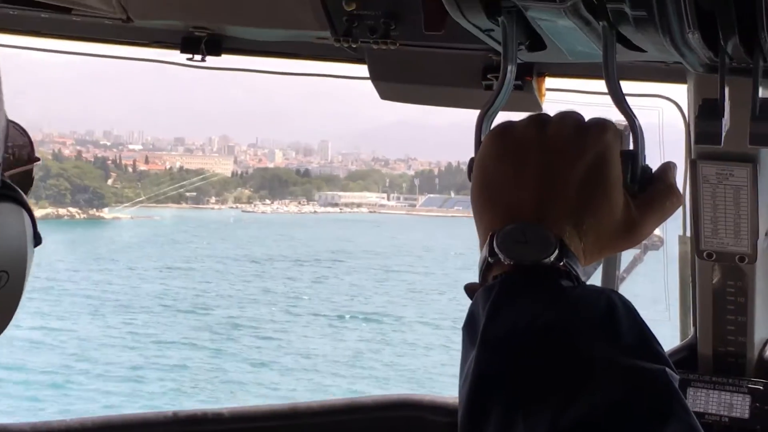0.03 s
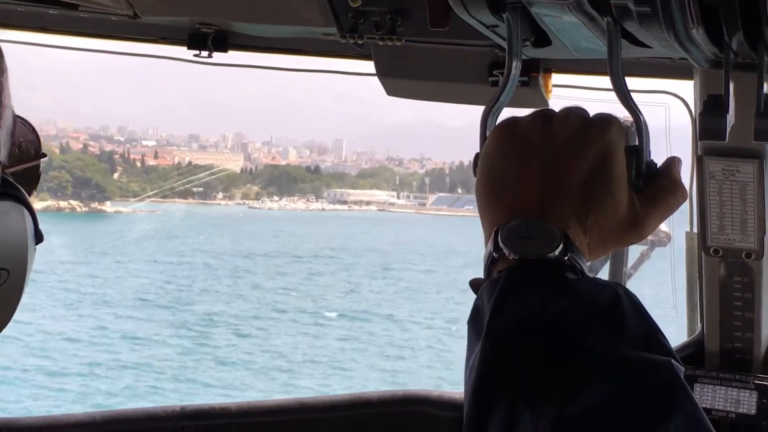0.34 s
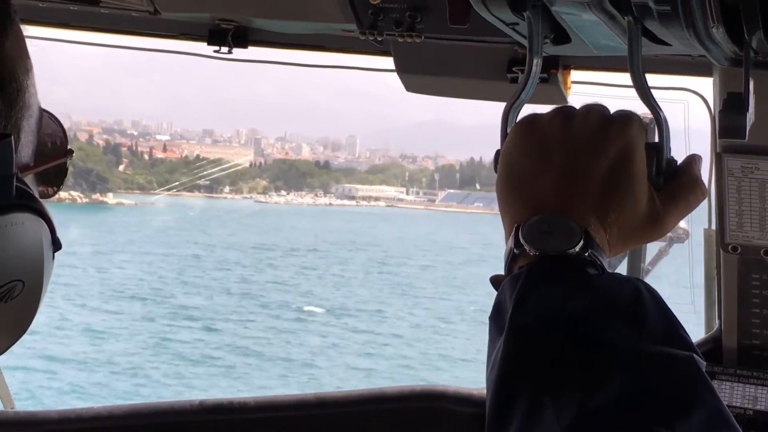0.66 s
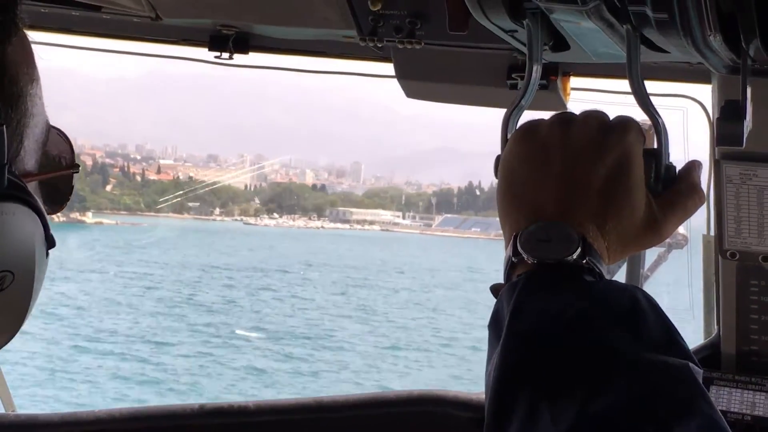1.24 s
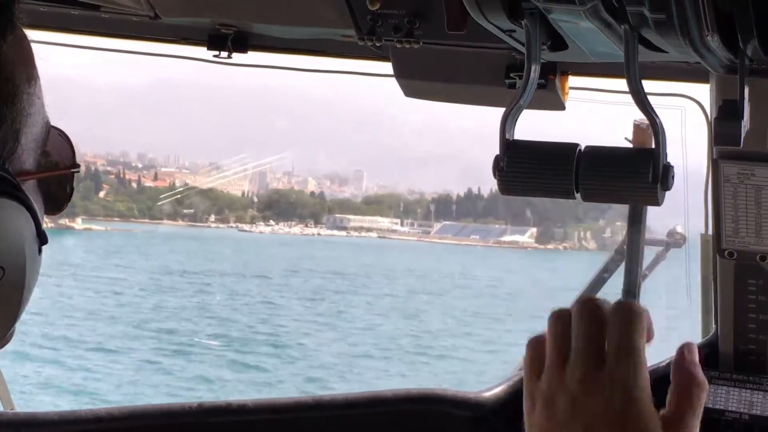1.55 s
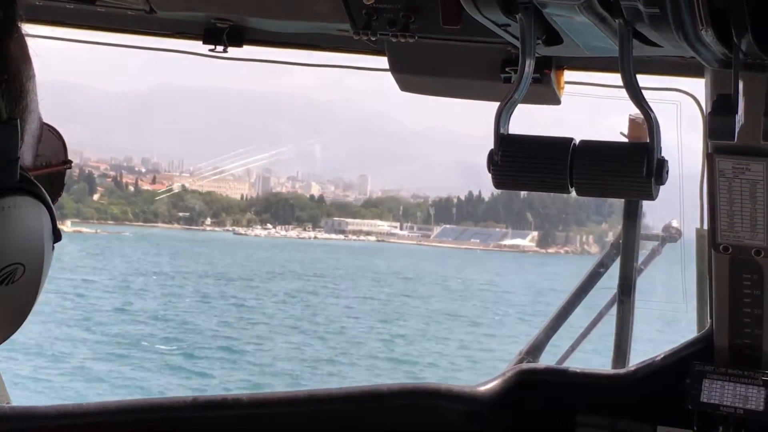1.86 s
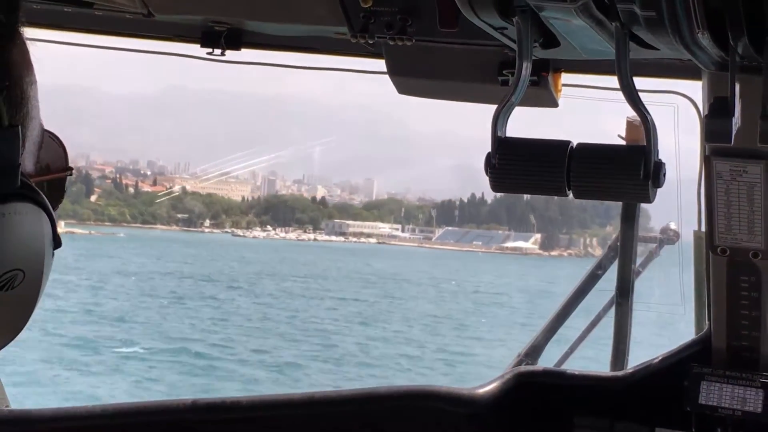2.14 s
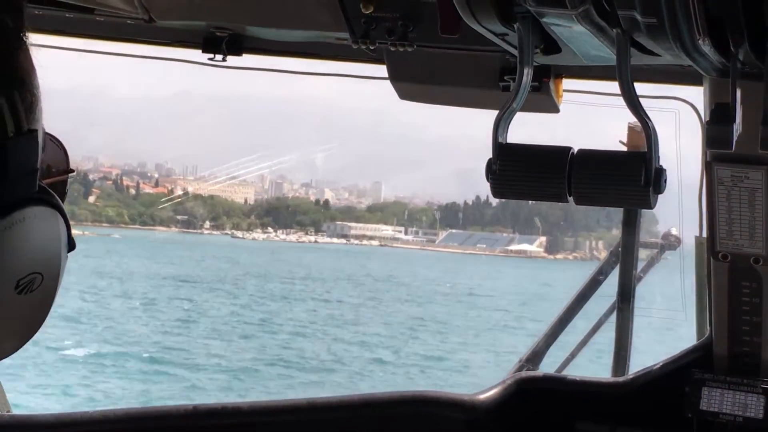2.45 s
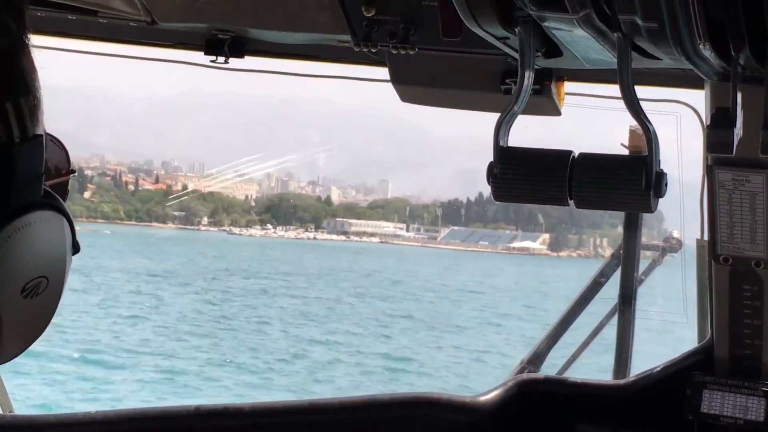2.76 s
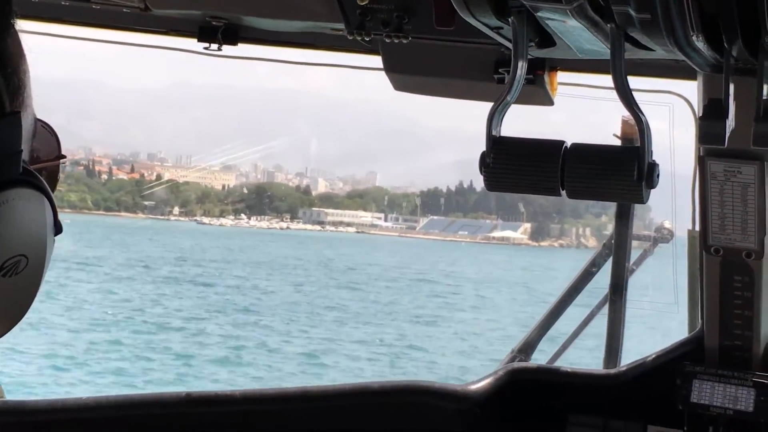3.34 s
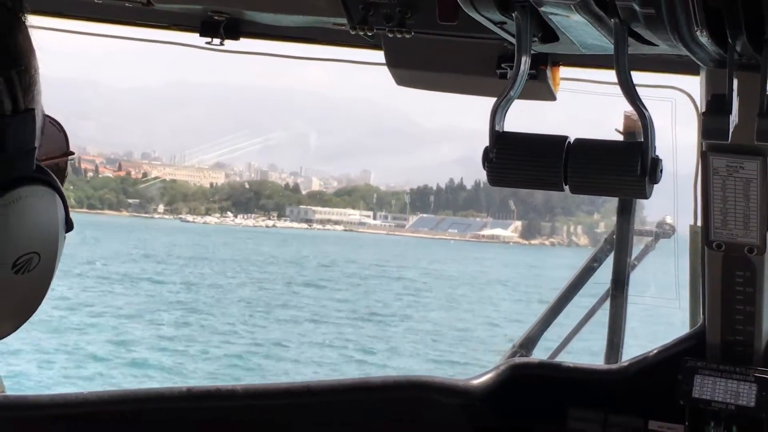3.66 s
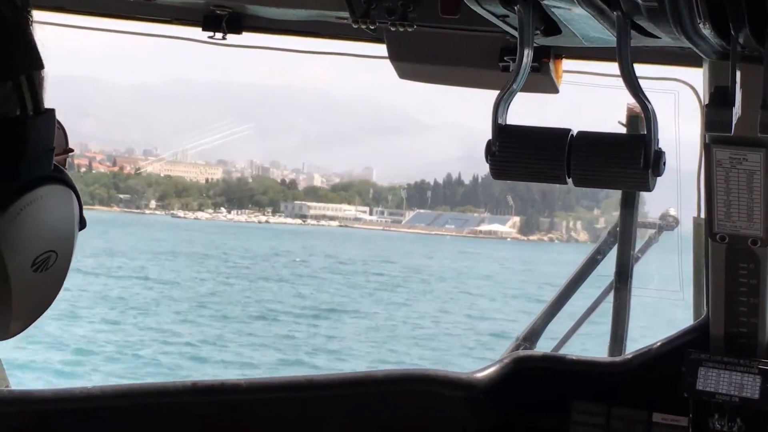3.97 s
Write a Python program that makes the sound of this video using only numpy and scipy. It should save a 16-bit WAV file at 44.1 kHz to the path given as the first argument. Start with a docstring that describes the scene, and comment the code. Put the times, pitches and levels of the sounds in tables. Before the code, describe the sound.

A deep, pulsing propeller drone fills the cabin of a small plane in flight, with the microphone in the cockpit. The propellers speed up a little while the low rumble and air rush ease slightly. A thin turbine whine wavers above.

```python
"""Two propellers drone, heard in the cockpit of a turboprop seaplane flying low over water.
Each blade sends a suction pulse through the hull. The propellers speed up a little and settle,
slightly out of step, so the drone throbs four to five times a second.
Under them buffeting makes the hull rumble; above them air rushes past, easing off, and the
turbines whine."""
import sys
import numpy as np
from scipy import signal
from scipy.fft import rfft, irfft
from scipy.io import wavfile

SR = 44100
rng = np.random.default_rng(int(sys.argv[2]) if len(sys.argv) > 2 else 0)


def transcribe(u):
    """Save the signal u as a 16-bit wav file named by the first command-line argument.

    u: samples, shape (n,) or (channels, n), limited to [-1, 1]; the rate is SR.
    q: integer samples, one column per channel.
    """
    v = np.clip(np.atleast_2d(u).T, -1, 1)
    q = np.round(v * 32767).astype(np.int16)
    wavfile.write(sys.argv[1], SR, q)


N = 176400


def undb(db):
    """Decibels to gain."""
    return 10 ** (np.asarray(db) / 20)


def unit_rms(x):
    """Scale to rms 1."""
    return x / np.sqrt(np.mean(x ** 2))


def curve(table, column=1):
    """One table column, interpolated linearly in time."""
    rows = np.array(table, float)
    return np.interp(np.arange(N) / SR, rows[:, 0], rows[:, column])


def wander(per_s):
    """Smooth random signal, rms 1, changing about per_s times a second."""
    hz = np.arange(N // 2 + 1) * SR / N
    lowpass = np.exp(-(2 * hz / per_s) ** 2) * (hz > 0)
    return unit_rms(irfft(rfft(rng.standard_normal(N)) * lowpass, N))


def coloured_noise(spectrum):
    """Noise, rms 1, shaped by (Hz, dB) points."""
    points_hz, points_db = np.array(spectrum, float).T
    hz = np.maximum(np.arange(N // 2 + 1) * SR / N, 1)
    gain = undb(np.interp(np.log(hz), np.log(points_hz), points_db))
    return unit_rms(irfft(rfft(rng.standard_normal(N)) * gain, N))


def noise_band(centre_hz, width_hz):
    """Narrow noise band, rms 1; the centre may move."""
    phase = 2 * np.pi * np.cumsum(centre_hz * np.ones(N)) / SR
    return wander(2 * width_hz) * np.cos(phase) + wander(2 * width_hz) * np.sin(phase)


def blade_passes(rate_hz, in_step_s=0.109):
    """Running count of blade passes, zero at in_step_s for both propellers."""
    passes = np.cumsum(rate_hz) / SR
    return passes - np.interp(in_step_s * SR, np.arange(N), passes)


# Blade-pass rates. Each row: time in seconds, near propeller in Hz, far propeller in Hz.
BLADE_RATES = [(0.0, 95.44, 91.08), (0.6, 96.23, 91.83), (1.0, 97.19, 92.41), (1.35, 98.47, 93.32),
               (1.7, 98.99, 94.08), (2.3, 98.66, 94.37), (3.2, 98.58, 94.01), (4.0, 98.18, 93.44)]
# Blade harmonics in the cabin. Each row: multiple, near level in dB, far level in dB,
# gain in dB per Hz of near blade rate above cruise.
BLADE_HARMONICS = [(1, -17, -22, 0.3), (2, -19.6, -24.5, -0.1), (3, -22.5, -38.5, -0.23),
                   (4, -37.5, -40, 1.2), (5, -46, -52.5, .5), (6, -42, -53.5, 0.9), (7, -43, -60, 2.1),
                   (8, -65, -65, 1.5), (9, -56.5, -73, 1), (10, -58.5, -57, 2.5)]
NEAR, FAR = 1, 2  # columns of both tables
CRUISE_HZ, FLUTTER_PER_S, JITTER_PASSES = 98.5, 27, 0.0022


def propeller(side, fundamental_lag_s):
    """Blade suction pulses cross the hull; cabin gain shifts with speed, and turbulence shakes it."""
    rate_hz = curve(BLADE_RATES, side)
    passes = blade_passes(rate_hz) + JITTER_PASSES * wander(FLUTTER_PER_S)
    overspeed_hz = curve(BLADE_RATES, NEAR) - CRUISE_HZ
    drone = 0
    for row in BLADE_HARMONICS:
        multiple, cruise_db, db_per_hz = round(row[0]), row[side], row[-1]
        flutter_db = 0.95 if multiple * CRUISE_HZ > 350 else 0.47
        level_db = cruise_db + db_per_hz * overspeed_hz + flutter_db * wander(FLUTTER_PER_S)
        cycles = multiple * passes
        if multiple == 1:
            cycles -= fundamental_lag_s * rate_hz
        drone -= np.sqrt(2) * undb(level_db) * np.cos(2 * np.pi * cycles)
    return drone


# Rumble spectrum. Each row: frequency in Hz, relative density in dB.
RUMBLE_SPECTRUM = [(15, -42), (23, -23), (31, -15), (42, -3), (63, 0), (85, -5.5), (125, -10.5),
                   (165, -15.5), (225, -21.5), (280, -15.5), (340, -25.5), (440, -34), (800, -55.5)]
# Rumble envelope. Each row: time in seconds, level in dB.
RUMBLE_ENVELOPE = [(0, -23), (.7, -22), (1.3, -25), (2.2, -26), (4, -25)]


def hull_rumble(swell_db=1.1):
    """Buffeting shakes the hull into a low, uneven rumble."""
    return coloured_noise(RUMBLE_SPECTRUM) * undb(curve(RUMBLE_ENVELOPE) + swell_db * wander(3.4))


# Air rush spectrum. Each row: frequency in Hz, relative density in dB.
AIR_SPECTRUM = [(200, -1.5), (450, 1), (680, 4), (800, -1), (1000, -1), (1100, -1), (1300, 0.5), (1600, -3),
                (1850, -2.5), (2400, -4.5), (2850, -8.5), (3600, -7), (4350, -11.5), (4900, -14.5),
                (5600, -12.5), (7200, -13.5), (9000, -12.5), (9800, -15), (10400, -21.5), (11200, -20.5),
                (13500, -24.5), (15800, -22.5)]
# Air rush envelope. Each row: time in seconds, level in dB.
AIR_ENVELOPE = [(0, -36.5), (.5, -36.5), (1.3, -37), (2.1, -39.5), (4, -39)]


def air_rush(swell_db=0.62, chop_depth=0.068):
    """Slipstream and engine rush, lightly chopped by the near propeller."""
    rush = coloured_noise(AIR_SPECTRUM)
    chop = 1 + chop_depth * np.cos(2 * np.pi * blade_passes(curve(BLADE_RATES, NEAR)))
    level_db = curve(AIR_ENVELOPE) + swell_db * wander(18)
    return rush * chop * undb(level_db)


# Rings in the rush. Each row: centre in Hz, width in Hz, initial level in dB, slope in dB per second.
AIR_RINGS = [(1270, 65, -56.5, 0), (1818, 66, -51.5, -2.5), (2590, 30, -57, -3.5), (4500, 160, -55.5, -2.5),
             (10900, 350, -64, -1.5)]


def air_rings():
    """Faint narrow bands ring in the rushing air; most fade slowly."""
    time_s = np.arange(N) / SR
    return sum(noise_band(centre_hz, width_hz) * undb(initial_db + db_per_s * time_s)
               for centre_hz, width_hz, initial_db, db_per_s in AIR_RINGS)


# Turbine hiss band and two tones. Each row: time in seconds, frequency in Hz, level in dB.
TURBINE_HISS = [(0, 7930, -54), (.4, 8020, -55), (1, 8130, -51), (1.45, 8220, -52), (2, 8250, -50),
                (2.5, 8240, -52.5), (3, 8230, -50), (4, 8240, -52)]
TURBINE_LOW_TONE = [(0, 7840, -56), (.35, 7810, -55), (.6, 7870, -68), (1.1, 7990, -64), (1.38, 8130, -51),
                    (2.05, 8125, -55), (2.2, 8215, -56), (2.65, 8195, -64), (3.1, 8172, -59),
                    (3.5, 8168, -61), (4, 8168, -53)]
TURBINE_HIGH_TONE = [(0, 8030, -52), (.3, 8100, -62), (.5, 8110, -58), (1, 8230, -61), (1.25, 8350, -59),
                     (1.65, 8500, -60), (2, 8370, -60), (2.5, 8360, -63), (2.95, 8357, -51),
                     (3.5, 8350, -65), (4, 8340, -63)]


def turbine_whine(waver_hz=7.7, fade_db=2.5):
    """Two wavering turbine tones fade in and out within a narrow band of hiss."""
    whine = noise_band(curve(TURBINE_HISS), width_hz=260) * undb(curve(TURBINE_HISS, column=2))
    for tone in (TURBINE_LOW_TONE, TURBINE_HIGH_TONE):
        pitch_hz = curve(tone) + waver_hz * wander(59)
        level_db = curve(tone, column=2) + fade_db * wander(16)
        phase = 2 * np.pi * np.cumsum(pitch_hz) / SR
        whine += np.sqrt(2) * undb(level_db) * np.sin(phase)
    return whine


def scene():
    """Propellers, hull, air and turbines, in mono."""
    lag_s = 0.00075  # a cabin standing wave delays the near fundamental and advances the far one
    drone = propeller(NEAR, lag_s) + propeller(FAR, -lag_s)
    return (drone + hull_rumble() + air_rush() + air_rings() + turbine_whine())[None]


def record(dry):
    """A steep low-pass cuts the top treble."""
    cutoff_hz = 15750
    return signal.sosfilt(signal.ellip(10, .1, 80, cutoff_hz, fs=SR, output="sos"), dry)


dry = scene()
out = record(dry)
transcribe(out)
```